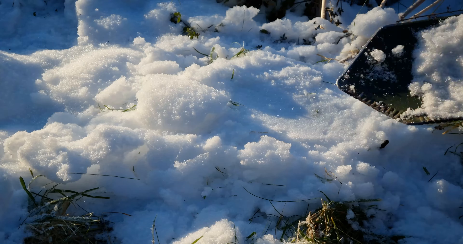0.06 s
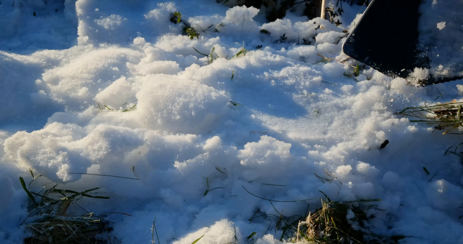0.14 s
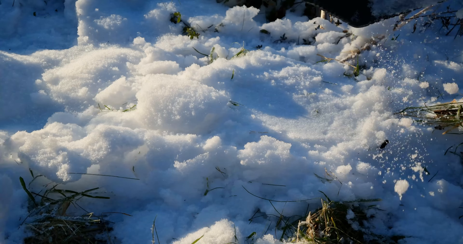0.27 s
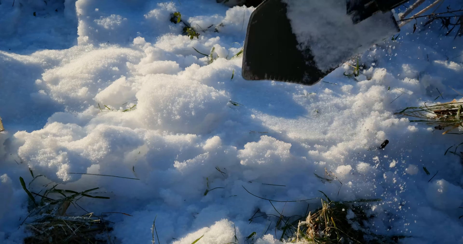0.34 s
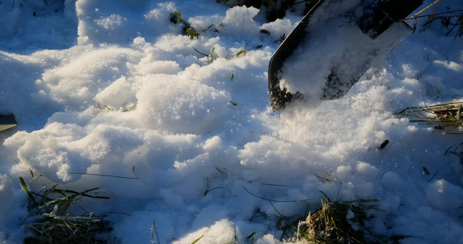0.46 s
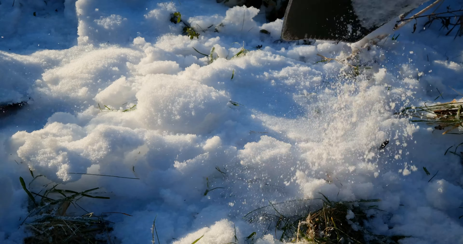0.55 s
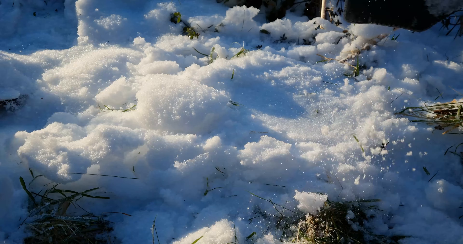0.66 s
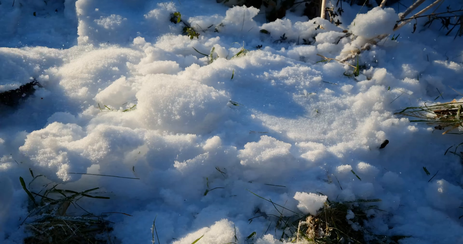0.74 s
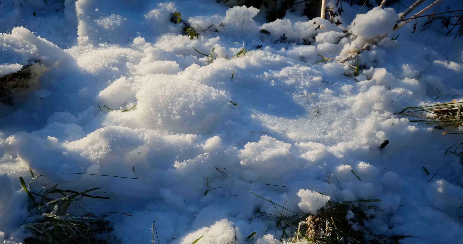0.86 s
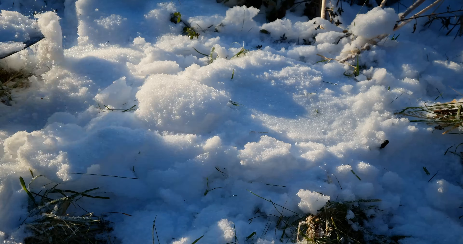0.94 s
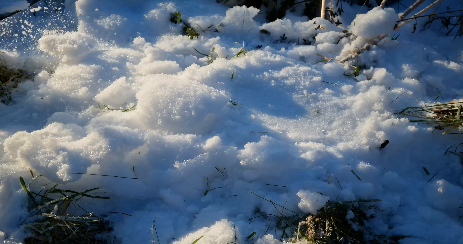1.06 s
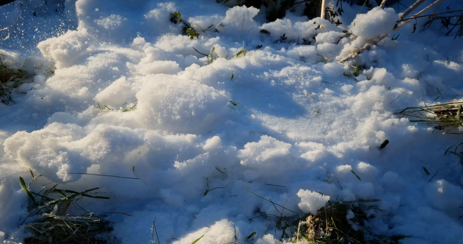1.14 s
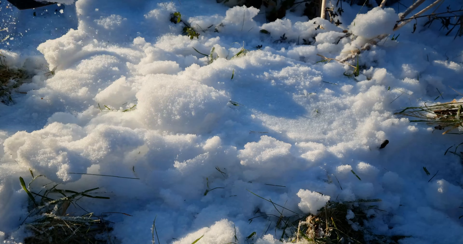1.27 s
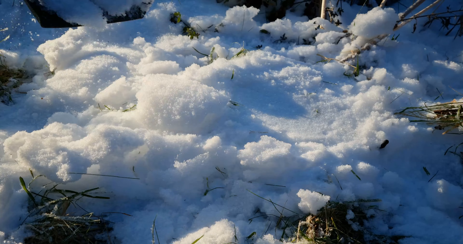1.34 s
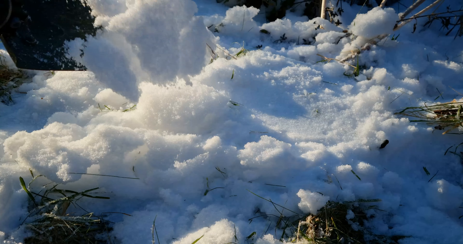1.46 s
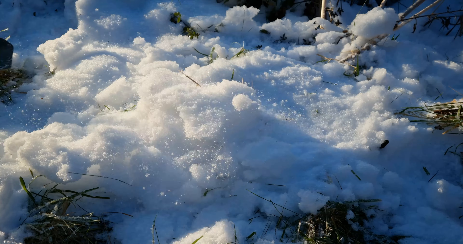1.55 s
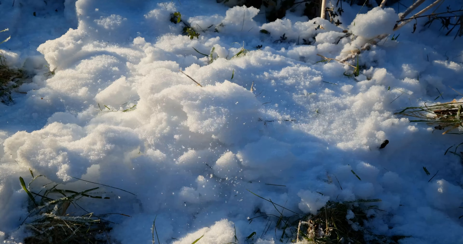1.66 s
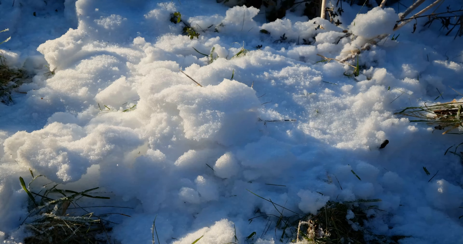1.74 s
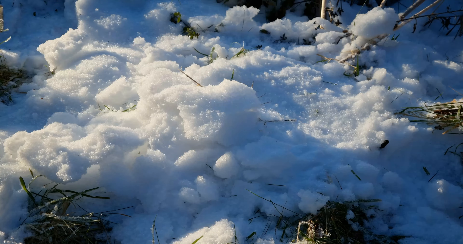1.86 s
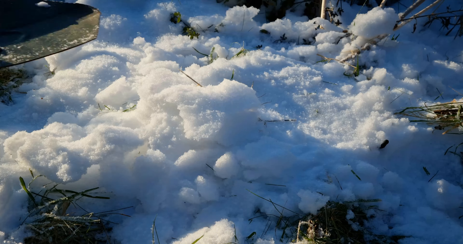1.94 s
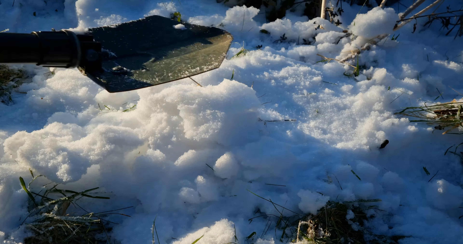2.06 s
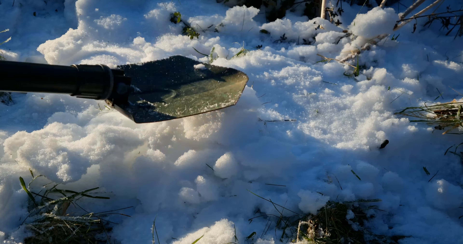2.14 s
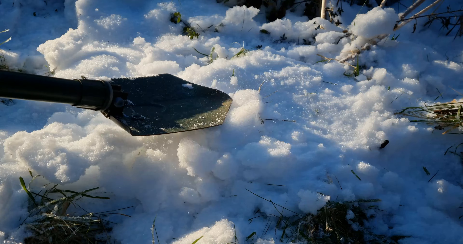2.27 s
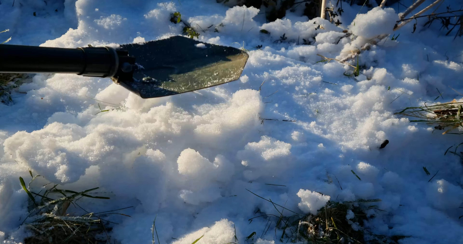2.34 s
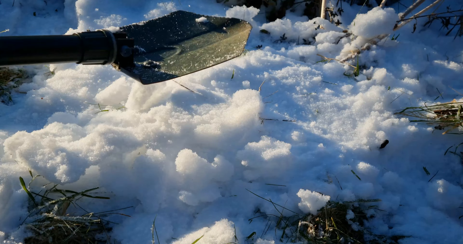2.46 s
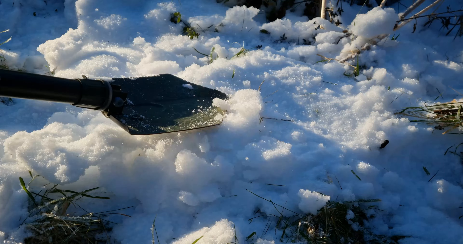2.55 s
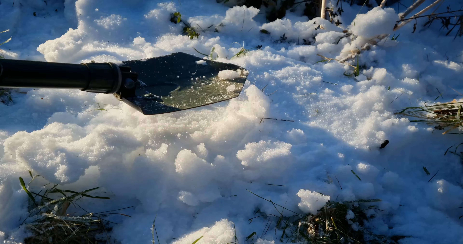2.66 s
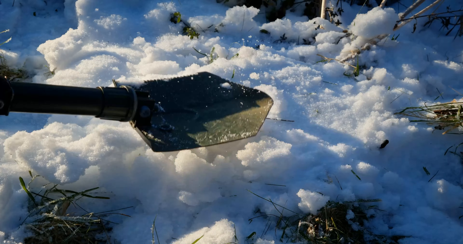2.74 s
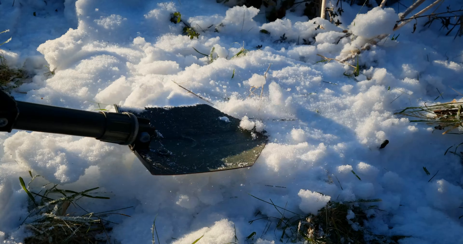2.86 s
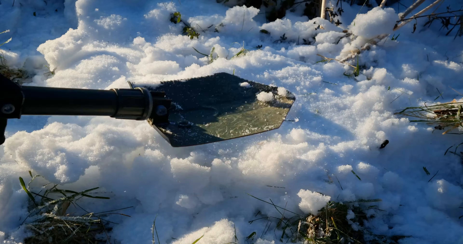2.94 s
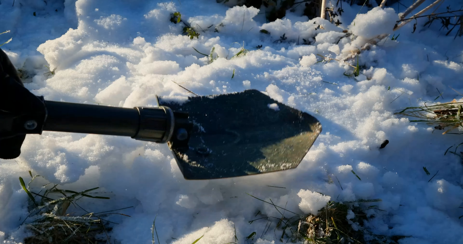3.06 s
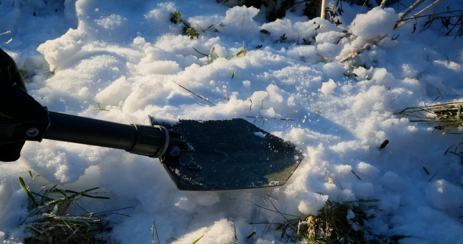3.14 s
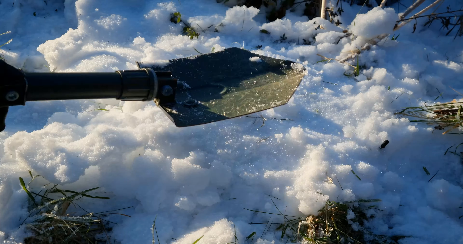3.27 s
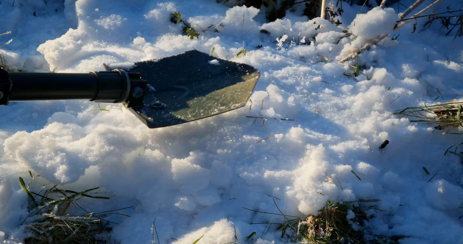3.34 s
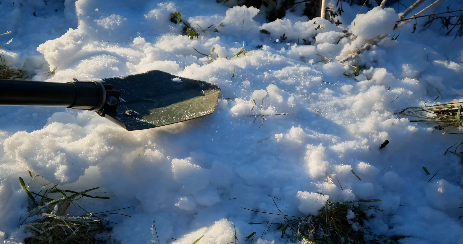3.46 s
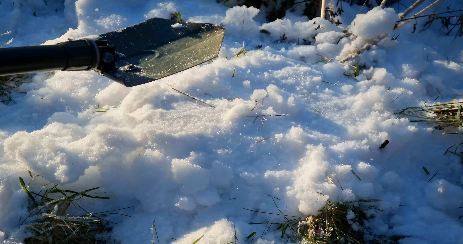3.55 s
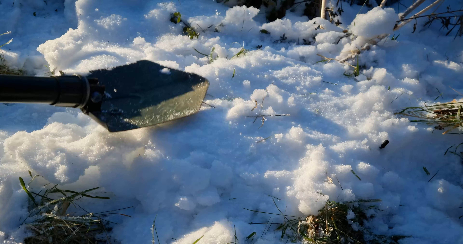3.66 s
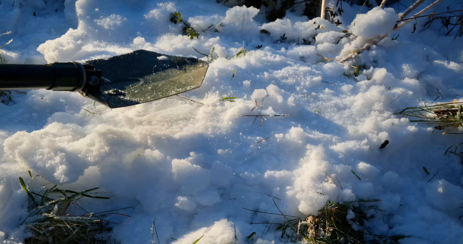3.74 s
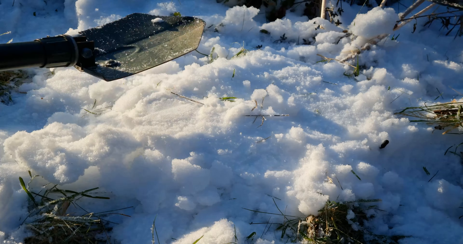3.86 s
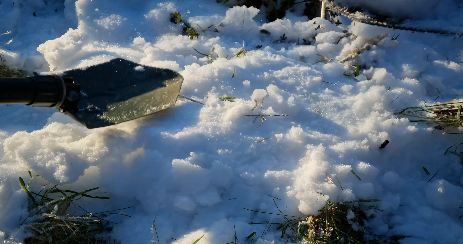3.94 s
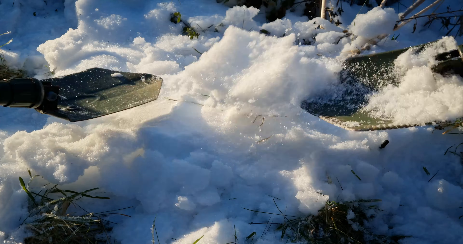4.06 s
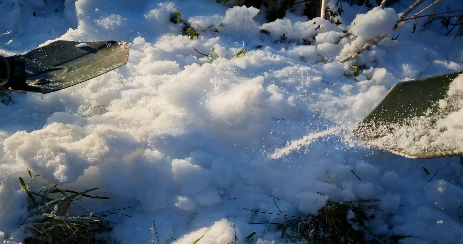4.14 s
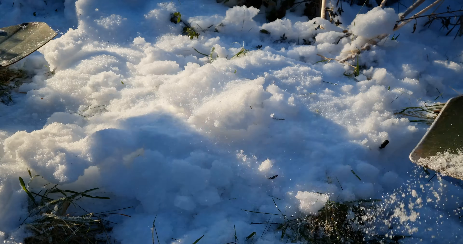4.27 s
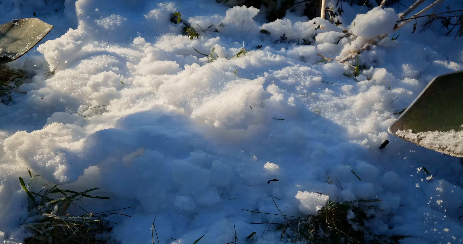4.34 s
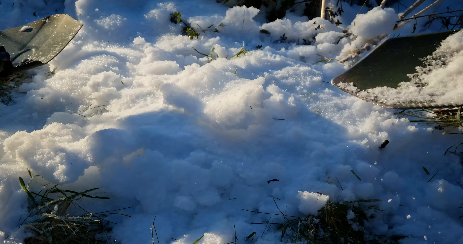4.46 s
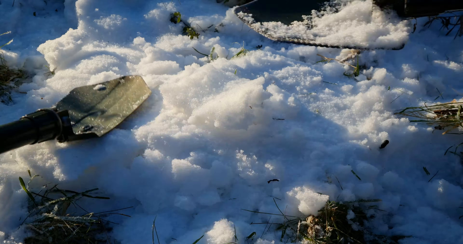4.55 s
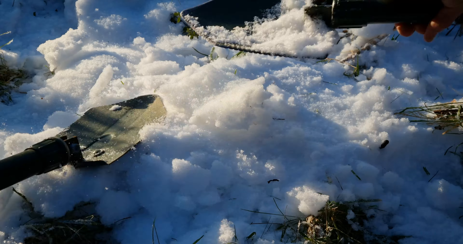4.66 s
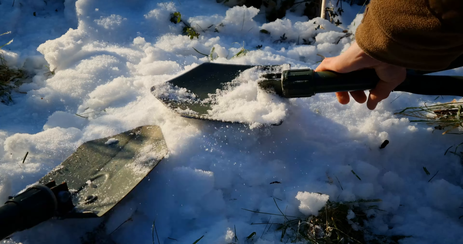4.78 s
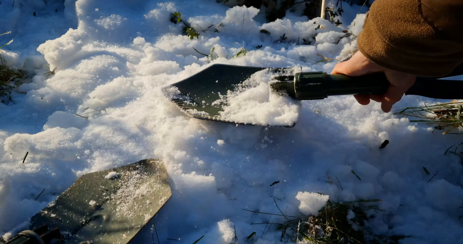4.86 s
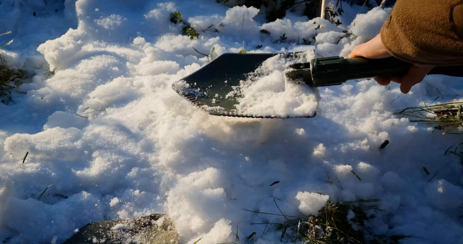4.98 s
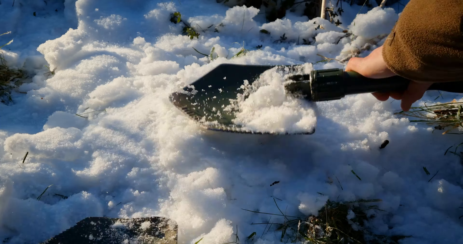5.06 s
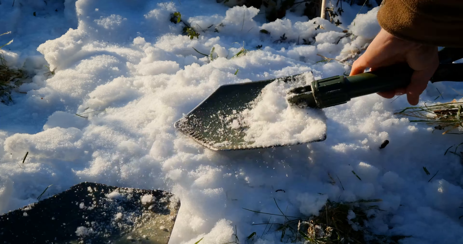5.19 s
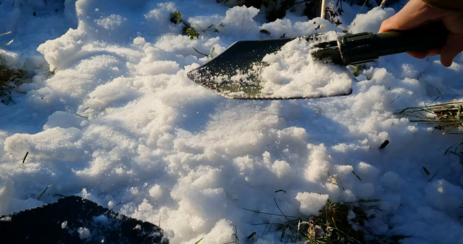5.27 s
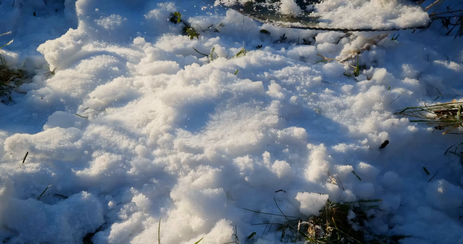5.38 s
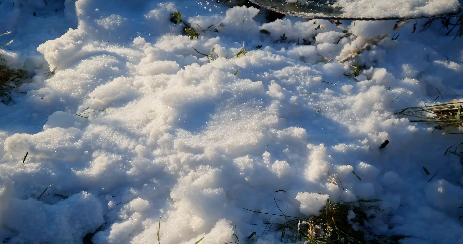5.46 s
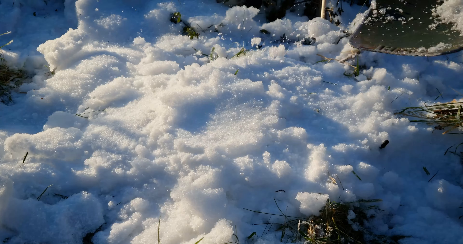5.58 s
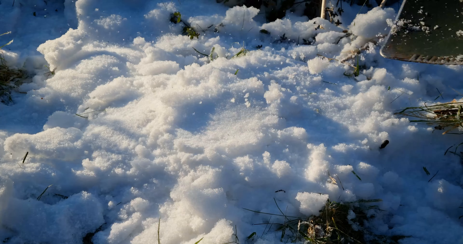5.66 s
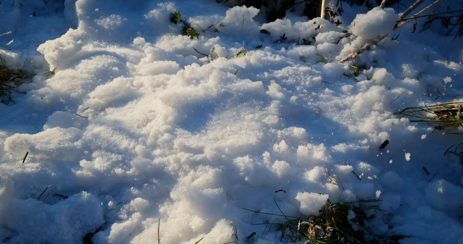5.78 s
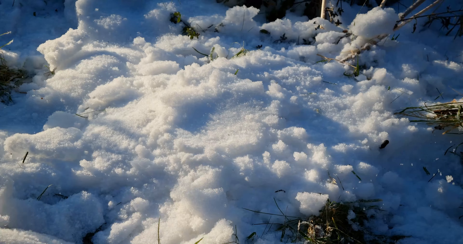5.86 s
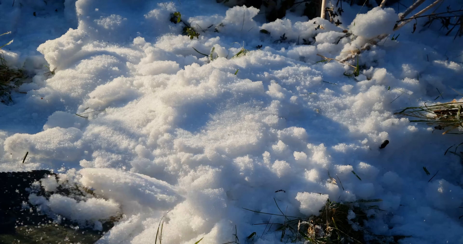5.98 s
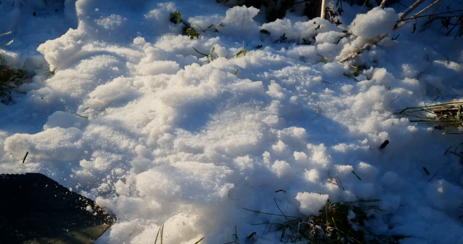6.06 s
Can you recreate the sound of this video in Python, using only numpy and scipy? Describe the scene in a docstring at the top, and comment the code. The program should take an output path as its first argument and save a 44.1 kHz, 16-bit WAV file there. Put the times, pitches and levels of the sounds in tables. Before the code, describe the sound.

Crisp snow digging, soft tossed lumps and sharp clanking pats of a metal shovel blade, close up outdoors over quiet distant traffic rumble.

```python
"""Outdoors, two small steel shovels work a heap of dry snow; two spaced microphones hear them.
A short scrape of the near blade on the left gives way to the right blade digging and tossing; then the
near blade pats the heap and its plate rings, and both dig again, the near one last. Blades are bursts of
random grain fractures, filtered into crunch, dust and thud or shaking ringing plate modes. Throughout,
crumbs tick, and filtered noise gives far traffic rumble and thin hiss over two low wavering tones."""
import sys
import numpy as np
from scipy import signal
from scipy.fft import rfft, irfft
from scipy.io import wavfile

SR = 44100
rng = np.random.default_rng(int(sys.argv[2]) if len(sys.argv) > 2 else 0)


def field_ratio(decibels):
    """Amplitude ratio for a level in dB (20 dB per decade); scalars and array-likes work."""
    return 10 ** (np.asarray(decibels, dtype=float) / 20)


def log_audio(samples):
    """Write samples as a 16-bit WAV file to the path given in sys.argv[1]."""
    # one column per channel
    frames = np.atleast_2d(samples).T
    # limit to full scale, then quantise
    limited = np.clip(frames, -1, 1)
    pcm = np.round(limited * 32767).astype(np.int16)
    wavfile.write(sys.argv[1], SR, pcm)


N = 269892   # length in samples

# Near blade pushed through snow, one list per stroke: [t/s, crunch level/dB, thud rel. level/dB]
NEAR_STROKES = [
    [(0.436, -72, -10), (0.466, -47.5, -20), (0.502, -42.5, 1.5), (0.638, -44.5, -5), (0.666, -43.5, 4),
     (0.722, -49, -8), (0.754, -66, 1)],
    [(4.78, -46, -17), (4.824, -35, -17), (4.858, -43.5, -12), (4.89, -41.5, -26), (4.964, -34, 1),
     (5.014, -32, 0), (5.076, -51, -0.5), (5.114, -61, -3)],
    [(5.76, -67, 0), (5.782, -43.5, -17), (5.804, -38, -15), (5.876, -34.5, -29), (5.902, -54, -1),
     (5.944, -45.5, -23), (5.99, -69, -6)],
]
# Ice dust of each near stroke: [rel. level/dB]
NEAR_STROKE_DUST = [-2.5, -4, 2.5]
# Loose snow trickling by the near blade; swell and die are times per 20 dB:
# [peak t/s, swell/s, die/s, peak level/dB, thud rel. level/dB]
NEAR_CRUMBLES = [(2.29, 0.037, 0.056, -49.5, 0), (2.388, 0.12, 0.11, -49.5, 0),
                 (2.676, 0.12, 0.21, -51.5, -17), (2.93, 0.019, 0.16, -51.5, -6),
                 (3.064, 0.032, 0.28, -58, 3.5), (3.22, 0.065, 0.1, -58, 9),
                 (3.519, 0.083, 0.034, -52.5, -5), (3.65, 0.033, 0.018, -63.5, 5),
                 (3.79, .03, .06, -67.5, 5), (3.92, .03, 0.041, -86, 26.5), (5.2, .03, 0.25, -59.5, 3),
                 (5.478, 0.11, 0.39, -69.5, 4), (6.1, 0.13, .1, -62.5, 7)]
# Pats and knocks of the near blade:
# [t/s, blow level/dB, thud rel. level/dB, clank f/Hz, clank rel. level/dB, press rel. level/dB]
PATS = [(0.4707, -39, -24, 4330, 22.5, -54), (0.54, -27, 8, 6350, 12, -19),
        (2.2488, -17, -34, 1560, -2, -1), (2.5921, -8.5, -8, 1742, 4, -23),
        (2.8654, -24.5, -23, 1390, 2, -10), (2.8751, -12.5, -28, 1647, -5, -3),
        (2.8849, -6, -35, 1895, -10.5, -15.5), (3.0596, -43.5, -22, 4700, 25, -24),
        (3.1743, -12.5, -23, 4220, 8.5, -38), (3.182, -6.5, -17, 1600, -9.5, -10.5),
        (3.478, -9, -24, 5070, 5.5, -20.5), (3.5007, -45.5, -24, 1666, 14.5, -2.5),
        (3.7437, -4, -17, 1550, -2, -29), (4.0355, -5.5, -21, 5330, -2.5, -14),
        (4.8182, -19, -26, 3360, 8, -8), (5.0043, -32, -25, 6500, 3, -17),
        (5.1006, -33.5, -19, 5400, -6.5, 3), (5.1621, -15, -28, 3500, 1, -10),
        (5.7804, -31, -23, 3340, 2, -19), (5.7911, -25.5, -24, 3450, 6.5, -4),
        (6.0793, -38, -13, 3340, 10.5, -4.5)]
# Soft lumps landing by the near blade: [t/s, blow level/dB, thud rel. level/dB, press rel. level/dB]
NEAR_LUMPS = [(0.4976, -21, 4, -40), (2.988, -37.5, 8, -25), (3.2835, -37, 10.5, -34)]
# Packed snow giving way under the near blade: [f/Hz, rel. level per Hz/dB]
NEAR_THUD = [(59, -47), (100, -57), (364, -9), (694, 10), (1370, -4.5), (1500, -4), (1950, -16),
             (3300, -120)]


def near_shovel():
    """Near blade: strokes, trickling snow and long blows; a faint rise of noise leads in each firm pat."""
    firm_pat_db, lead_in_db, lead_in_swell_s = -20, -45, 0.039   # lead-in level is relative to its pat
    lead_ins = [(s, lead_in_swell_s, .01, db + lead_in_db, -5.) for s, db, *_ in PATS if db > firm_pat_db]
    events = blow_rows(PATS, NEAR_LUMPS)
    return shovel(slide=sliding(NEAR_STROKES, NEAR_STROKE_DUST, NEAR_CRUMBLES + lead_ins),
                  events=events,
                  hits=blows(events, rise_s=0.006, crack_s=0.0061, press_s=0.023, fade_s=0.008),
                  thud_colour=NEAR_THUD, thuds_per_s=1500., ring_db=-13, clank_damping=5,
                  lags=(-5.0, -17.0, -16.0, -1.0), pans_db=(3.9, 10.5, 3.8, 5.5))


# Right blade digging and tossing, one list per stroke: [t/s, crunch level/dB, thud rel. level/dB]
FAR_STROKES = [
    [(0.77, -59, 5), (0.81, -48.5, 5), (0.97, -56.5, 22), (1.042, -56, 17), (1.132, -58, 24.5),
     (1.204, -62.5, 11.5), (1.262, -61, 16.5), (1.358, -56, 9.5), (1.4, -69, 12)],
    [(1.82, -68, -7), (1.852, -54, 2), (1.9, -56, -17), (1.952, -48, -17), (2.058, -44.5, -1),
     (2.202, -58, 8), (2.24, -59, -7)],
    [(4.116, -64, 0), (4.132, -43, -20), (4.15, -73, -20), (4.18, -52.5, 2), (4.29, -56, 7),
     (4.39, -70, 14)],
    [(4.49, -64, 5), (4.534, -50.5, 14.5), (4.584, -42.5, 11.5), (4.64, -39.5, 10.5), (4.666, -32, 0),
     (4.684, -39.5, 11), (4.774, -48, 13), (4.8, -62, -8)],
]
# Ice dust of each right stroke: [rel. level/dB]
FAR_STROKE_DUST = [-2.5, -2, -3, -3.5]
# Loose snow trickling on the right; swell and die are times per 20 dB:
# [peak t/s, swell/s, die/s, peak level/dB, thud rel. level/dB]
FAR_CRUMBLES = [(0.14, 0.37, 0.05, -72, 23), (0.394, 0.027, 0.044, -65.5, 17),
                (1.482, 0.19, 0.14, -68, 19.5), (1.594, 0.016, 0.046, -40, -11),
                (1.65, 0.098, 0.23, -63, 9), (4.415, 0.026, 0.11, -56, 16.5),
                (5.652, 0.14, 0.9, -66.5, 17.5)]
# Knocks of the right blade: [t/s, blow level/dB, clank f/Hz, clank rel. level/dB, press rel. level/dB]
KNOCKS = [(0.4529, -22.5, 640, -10, -30), (1.0853, -28, 2260, -8, -10), (1.589, -43.5, 2060, 14, -12),
          (1.625, -44, 2700, 15, -1.5), (4.128, -27.5, 3460, 12.5, -2), (4.562, -30, 2640, 15.5, 0),
          (4.6117, -40, 2250, 3, -21), (4.6992, -33, 646, 1, -20)]
# Soft lumps landing on the right: [t/s, blow level/dB, thud rel. level/dB, press rel. level/dB]
FAR_LUMPS = [(0.1544, -46, 7, -6), (1.1195, -24, 13, -12), (1.2116, -47.5, 15, 0.5), (2.367, -31, 11.5, -2),
             (2.476, -33, 8, -5.5), (4.278, -35, 14, -7), (4.2962, -35, 15, -13.5),
             (5.4827, -42.5, 16, -13.5), (5.657, -45, 27, -12), (5.6681, -50.5, 15, -20)]
# Packed snow giving way under the right blade: [f/Hz, rel. level per Hz/dB]
FAR_THUD = [(59, -56), (100, -10.5), (359, -0.5), (886, -2), (1170, 2), (2000, -11.5), (3000, -11),
            (4400, -58.5)]


def far_shovel():
    """Right blade: strokes, trickling snow and shorter blows, reaching the left microphone late."""
    knock_thud_db = -15
    knocks = [(s, db, knock_thud_db, *rest) for s, db, *rest in KNOCKS]
    events = blow_rows(knocks, FAR_LUMPS)
    return shovel(slide=sliding(FAR_STROKES, FAR_STROKE_DUST, FAR_CRUMBLES),
                  events=events,
                  hits=blows(events, rise_s=0.0012, crack_s=0.0016, press_s=0.016, fade_s=0.0048),
                  thud_colour=FAR_THUD, thuds_per_s=600., ring_db=-15.5, clank_damping=2.5,
                  lags=(16.54, 17.73, 8.7, 10.5), pans_db=(-0.25, -0.59, 0.68, -0.67))


# Near blade clear of the snow and ringing on:
# [t/s, shaken for/s, shaking level/dB, modes under 2 kHz rel. level/dB, modes of 2-3.4 kHz rel. level/dB]
CLEAR_BLADE = [(0.479, .16, -42, -9.5, -25), (3.2, 0.021, -63, -2, 14), (3.495, .02, -61.5, 6, 14),
               (4.05, 0.052, -61, 1, 3), (4.902, 0.11, -48, 7, -3), (5.788, 0.036, -39, -1.5, 11.5),
               (5.849, 0.052, -44, -2, -7), (5.93, 0.036, -51.5, 5.5, -2), (6.08, 0.032, -68, -4, 16)]


def clear_blade():
    """Freer ringing; the place of contact decides which group of modes is shaken most."""
    spans = [[(s, *levels), (s + length, *levels)] for s, length, *levels in CLEAR_BLADE]
    shaking_db, low_db, middle_db = in_time(spans)
    shake = grains(per_s=4000., spread_db=3.5, shared=.9) * field_ratio(shaking_db)

    def reach_db(hz):
        return low_db if hz < 2000 else middle_db if hz < 3400 else 0

    ringing = plate(shake, damping=1.2, wander_db=2, reach_db=reach_db)
    return placed(ringing, lag=-10.0, pan_db=5.5)


def shovel(slide, events, hits, thud_colour, thuds_per_s, ring_db, clank_damping, lags, pans_db):
    """Sliding and blows crush grains, shift packed snow and shake the plate.

    lags (samples) and pans are for crunch, thud, ring and clank in turn."""
    slide_crunch, slide_thud, slide_dust, slide_shake = slide
    hit_crunch, hit_thud, hit_clank, clank_hz = hits
    contact = np.zeros(N)   # the first touch of every blow is one firm click
    contact[[round(row[0] * SR) + 2 for row in events]] = 1
    crunch = crushing(slide_crunch + hit_crunch, contact)
    crunch += ice_dust(slide_dust + hit_crunch * field_ratio(-3.5))
    thud = packed_snow(slide_thud * field_ratio(-7) + hit_thud, contact, thud_colour, thuds_per_s)
    shake = grains(per_s=4000., spread_db=3.5, shared=.88)
    ring = plate(shake * field_ratio(ring_db) * slide_shake, damping=3.5, wander_db=5.5)
    clank = clanking(shake * hit_clank * field_ratio(5), clank_hz, clank_damping)
    return sum(placed(*part) for part in zip([crunch, thud, ring, clank], lags, pans_db))


# Crushed grains: [f/Hz, rel. level per Hz/dB]
CRUNCH = [(410, -16.5), (700, -9), (1310, -6.5), (1810, -0.5), (2420, -0.5), (3600, 3.5), (9000, -2.5),
          (11700, -5), (19800, -120)]


def crushing(gain, contact):
    """Dense fractures of snow grains give the crunch, its bands swelling one by one."""
    fine = grains(per_s=9000., spread_db=3.5, shared=.55) + 2 * contact
    return patchy(colour(fine * gain, CRUNCH), patch_db=4.5, rate=14.)


# Finest ice dust: [f/Hz, rel. level per Hz/dB]
DUST = [(5290, -27.5), (9000, -6), (13900, 25), (15000, 1.5), (15400, -103)]


def ice_dust(gain):
    """Still denser fractures sizzle in the treble."""
    return colour(grains(per_s=14000., spread_db=3, shared=.5) * gain, DUST)


def packed_snow(gain, contact, spectrum, per_s):
    """Sparser, coarse fractures thud as packed snow gives way."""
    coarse = grains(per_s=per_s, spread_db=3.0, shared=0.94) + 7.2 * contact
    return colour(coarse * gain, spectrum)


def clanking(force, clank_hz, damping):
    """A blow shakes the plate and favours the modes near one pitch."""
    def reach_db(hz):
        octaves = np.log2(hz / clank_hz)
        return -18 * (1 - np.exp(-(octaves / 0.11) ** 2))

    return plate(force, damping=damping, wander_db=1.5, reach_db=reach_db)


# Modes of the blade plate, t60 before damping: [f/Hz, rel. level/dB, t60/s]
PLATE = [(710, -10, .06), (1340, -8, .3), (1500, -4, .2), (1632, 1, .12), (1860, -3, .1), (2180, -9, .12),
         (2400, -8, .1), (2767, -5, .33), (3311, -4, .28), (3505, -4, .1), (3860, -9, .15), (4120, -5, .12),
         (4290, -6, .16), (4806, -7, .12), (5120, -6, .15), (5380, -4, .2), (5490, -6, .08), (5780, -5, .2),
         (5960, -7, .2), (6200, -8, .16), (6465, -5, .15), (7060, -8, .1), (7470, -5, .15), (7900, -8, .07)]


def plate(force, damping, wander_db, reach_db=lambda hz: 0):
    """Modes ring as two-pole resonators, waxing and waning; damping divides each t60."""
    out = 0
    for hz, level_db, t60 in PLATE:
        r = field_ratio(-60 * damping / (t60 * SR))
        w = 2 * np.pi * hz / SR
        gain_db = level_db + reach_db(hz) + wander_db * drift(10.)
        push = force * field_ratio(gain_db) * np.sqrt(1 - r * r)
        out = out + signal.lfilter([0, np.sin(w)], [1, -2 * r * np.cos(w), r * r], push + 1e-18)
    return out


def sliding(strokes, dusts_db, crumbles):
    """Gains of crunch, thud, dust and plate shaking from strokes and separate swells of noise."""
    crumble_dust_db, crumble_shake_db = -2, 0.5   # relative to the crumble's crunch
    tables = [[(*row, db) for row in rows] for rows, db in zip(strokes, dusts_db)]
    crunch_db, thud_db, dust_db = in_time(tables)
    gains = field_ratio([crunch_db, crunch_db + thud_db, crunch_db + dust_db, crunch_db])
    t = np.arange(N) / SR
    for s, swell_s, die_s, db, low_db in crumbles:
        shape = field_ratio(db - 20 * np.maximum((s - t) / swell_s, (t - s) / die_s))
        gains = gains + np.outer(field_ratio([0, low_db, crumble_dust_db, crumble_shake_db]), shape)
    return gains


def blow_rows(hits, lumps):
    """Hits and lumps in order of time, with the columns of the pats; lumps get one dull clank."""
    clank_hz, clank_db = 714, -1.5
    return sorted(hits + [(s, db, low_db, clank_hz, clank_db, press_db) for s, db, low_db, press_db in lumps])


def blows(events, rise_s, crack_s, press_s, fade_s):
    """A blow: short faint rise, sharp crack, then the snow is pressed for a while and lets go."""
    crunch, thud, clank = np.zeros((3, N + SR))
    pitch = np.full(N + SR, 3e3)
    t = np.arange(-1000, 8000) / SR
    for s, db, thud_db, clank_hz, clank_db, press_db in events:
        crack = np.where(t < 0, 0.092 * np.exp(t / rise_s), np.exp(-t / crack_s))
        press = field_ratio(press_db) * (t > 0) * np.exp(-np.maximum(t - press_s, 0) / fade_s)
        shape = field_ratio(db - 20) * np.maximum(crack, press)
        start = round(s * SR)
        at = slice(start - 1000, start + 8000)
        crunch[at] += shape
        thud[at] += shape * field_ratio(thud_db)
        clank[at] += shape * field_ratio(clank_db)
        pitch[start - 50:] = clank_hz
    return crunch[:N], thud[:N], clank[:N], pitch[:N]


def grains(per_s, spread_db, shared):
    """Random fractures of very uneven size, in clumps; each microphone also hears some of its own."""
    sizes = field_ratio(spread_db * np.minimum(rng.exponential(1, (3, N)), 4)) * rng.choice([-1, 1], (3, N))
    chance = per_s * field_ratio(3.0 * drift(40.)) / SR
    clicks = sizes * (rng.random((3, N)) < chance)
    shared = np.clip(shared, 0, 1)
    return rms_one(np.sqrt(shared) * clicks[0] + np.sqrt(1 - shared) * clicks[1:])


def patchy(x, patch_db, rate):
    """Grains of different size take turns: each third-octave swells and fades by itself."""
    out, edges = 0, 400 * 2 ** (np.arange(17) / 3)
    for low, high in zip(edges, edges[1:]):
        band = signal.sosfilt(signal.butter(1, [low, high], "band", fs=SR, output="sos"), x)
        out = out + band * field_ratio(patch_db * drift(rate))
    return out


def ticks():
    """Sparse crumbs drop on the crust, each a noise puff of a few milliseconds."""
    crumbs = np.abs(grains(per_s=49, spread_db=7.0, shared=0.83))
    puffs = signal.lfilter([1], [1, -np.exp(-1 / (0.0017 * SR))], crumbs)
    return field_ratio(-75.5) * colour(rms_one(puffs * rng.standard_normal(N)), CRUNCH)


# Rumble and hiss: [f/Hz, rel. level per Hz/dB]
AIR = [(13, -31), (22, -4.5), (64, 2.5), (82, 0), (150, -12.5), (252, -16.5), (424, -18.5), (528, -17),
       (1080, -17.5), (2730, -31), (3700, -37), (7140, -45), (11400, -51), (13800, -35.5), (15400, -87)]
# Left-right likeness of the air, 1 alike to -1 opposed: [f/Hz, likeness]
AIR_LIKENESS = [(40, 0.18), (120, 1), (300, 0.18), (1000, -0.82), (3000, -0.093)]


def air():
    """Far traffic and hiss as filtered noise, most alike in both microphones in the bass near 120 Hz."""
    mid, side = colour(rng.standard_normal((2, N)), AIR)
    alike = np.clip(at_hz(AIR_LIKENESS, np.arange(N // 2 + 1) * SR / N), -1, 1)
    mid = irfft(rfft(mid) * np.sqrt(1 + alike), N)
    side = irfft(rfft(side) * np.sqrt(1 - alike), N)
    return field_ratio(-56) * np.array([mid + side, mid - side])


# Two low tones of the background, their levels wavering by chance:
# [t/s, low tone rel. level/dB, upper tone rel. level/dB]
LOW_TONES = [(0.0, -58, -44), (0.71, -50.5, -48.5), (1.09, -49.5, -65), (1.31, -58, -78),
             (1.5, -53.5, -49.5), (2.22, -54, -46.5), (2.57, -55, -52.5), (3.53, -50, -57),
             (3.99, -50, -63.5), (4.65, -53, -51), (4.89, -57, -70), (5.15, -49, -51), (5.4, -57, -53),
             (5.78, -58, -77), (5.95, -48.5, -51), (6.12, -65, -53)]


def low_tones():
    """Two low tones that waver slightly in pitch."""
    low_db, upper_db = in_time([LOW_TONES])
    low_hz = 50.8 + 0.28 * drift(0.92)
    upper_hz = 63.6 + 0.93 * drift(2.6)
    low = field_ratio(low_db + 2.0) * np.sin(2 * np.pi * np.cumsum(low_hz) / SR)
    upper = field_ratio(upper_db + 1.0) * np.sin(2 * np.pi * np.cumsum(upper_hz) / SR)
    return low + upper


def placed(x, lag, pan_db):
    """Left microphone late by lag samples and louder by pan_db."""
    late = np.exp(-1j * np.pi * np.outer([lag, -lag], np.arange(N // 2 + 1)) / N)
    return irfft(rfft(x) * late, N) * field_ratio([[pan_db / 2], [-pan_db / 2]])


def colour(x, spectrum):
    """Causal (minimum-phase) filter of unit power gain."""
    cepstrum = irfft(np.log(field_ratio(at_hz(spectrum, np.arange(2049) * SR / 4096))))
    cepstrum[1:2048] *= 2   # fold onto positive time
    cepstrum[2049:] = 0
    pulse = irfft(np.exp(rfft(cepstrum)))
    return signal.oaconvolve(x, [pulse / np.sqrt(np.sum(pulse ** 2))], axes=1)[:, :N]


def at_hz(points, hz):
    """Reads a spectrum on a log-frequency axis."""
    points = np.array(points)
    return np.interp(np.log(hz + 1), np.log(points[:, 0]), points[:, 1])


def drift(rate):
    """Slow chance of unit rms: noise through two poles at rate (Hz), made every 40 samples."""
    r = np.exp(-80 * np.pi * rate / SR)
    noise = rng.standard_normal(N // 40 + 2002)
    slow = signal.lfilter([1], [1, -2 * r, r * r], noise)[2000:]   # skip the settling
    return np.interp(np.arange(N) / 40, np.arange(len(slow)), rms_one(slow))


def in_time(tables):
    """Joins tables into curves; the first level column falls to -90 dB between tables."""
    rows = []
    for table in tables:
        first, last = table[0], table[-1]
        rows += [(first[0] - .02, -90, *first[2:]), *table, (last[0] + .02, -90, *last[2:])]
    s, *columns = np.transpose(rows)
    return [np.interp(np.arange(N) / SR, s, c) for c in columns]


def rms_one(x):
    """Scales to unit rms."""
    return x / np.sqrt(np.mean(x ** 2) + 1e-20)


def scene():
    """Both shovels over the crumbs and the outdoor background."""
    return near_shovel() + clear_blade() + far_shovel() + ticks() + air() + low_tones()


def roll_off(x):
    """The treble ends steeply here."""
    return signal.sosfilt(signal.butter(12, 15520, fs=SR, output="sos"), x)


def record(dry):
    """The microphones drop the deepest bass, below 38 Hz."""
    low_cut = signal.butter(2, 38.0, "high", fs=SR, output="sos")
    mix = signal.sosfilt(low_cut, dry)
    return roll_off(mix)


dry = scene()
out = record(dry)
log_audio(out)
```